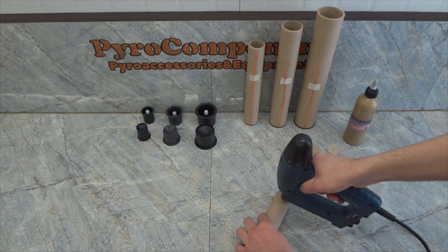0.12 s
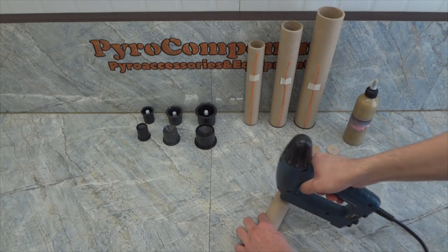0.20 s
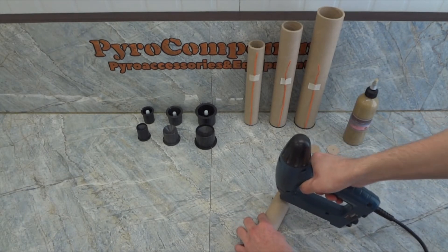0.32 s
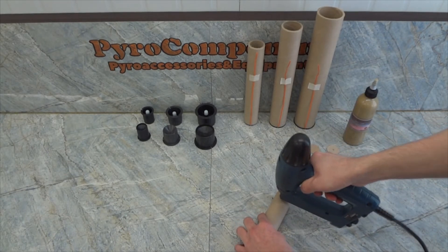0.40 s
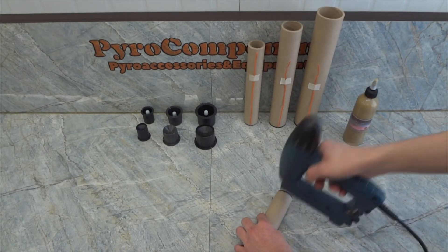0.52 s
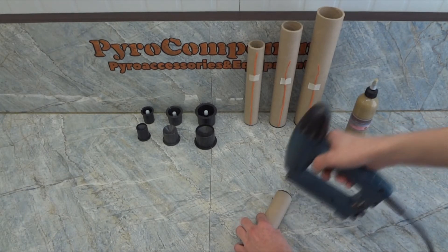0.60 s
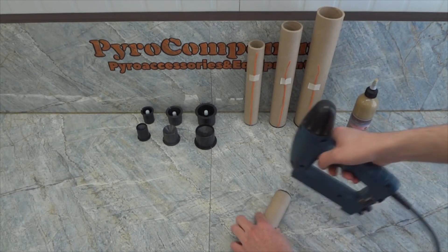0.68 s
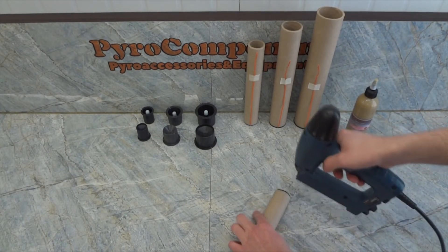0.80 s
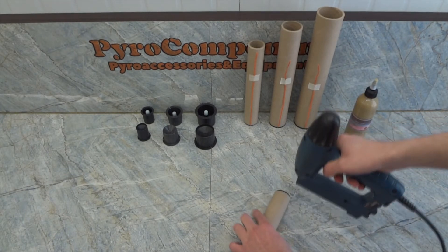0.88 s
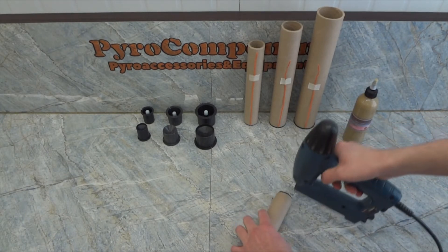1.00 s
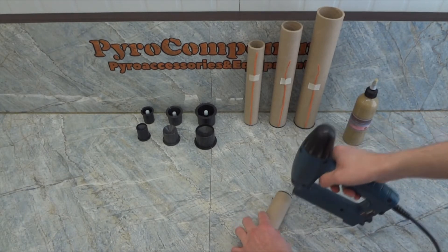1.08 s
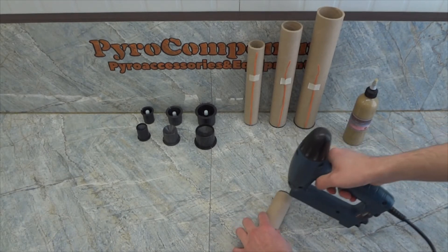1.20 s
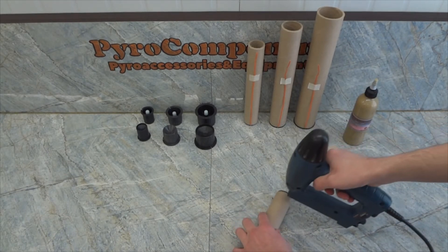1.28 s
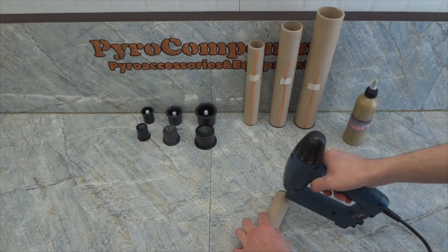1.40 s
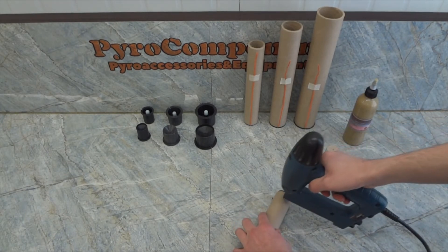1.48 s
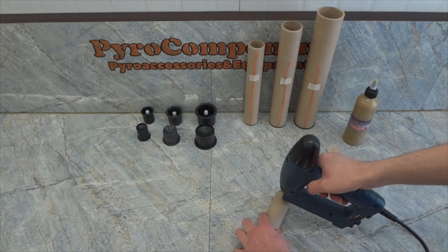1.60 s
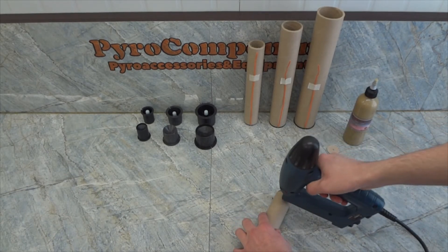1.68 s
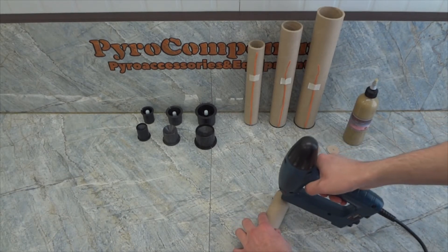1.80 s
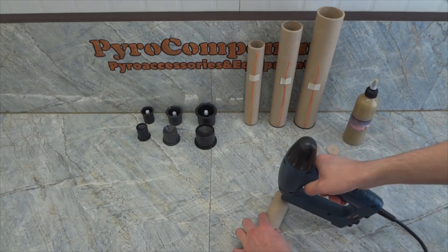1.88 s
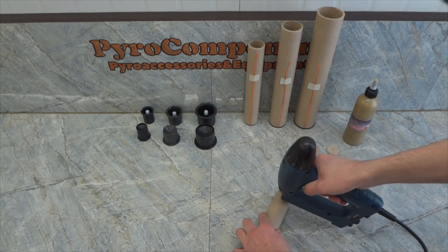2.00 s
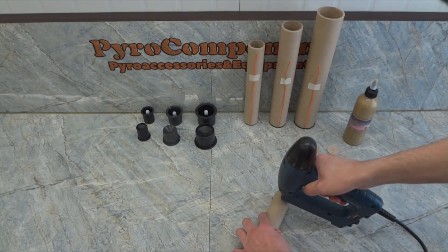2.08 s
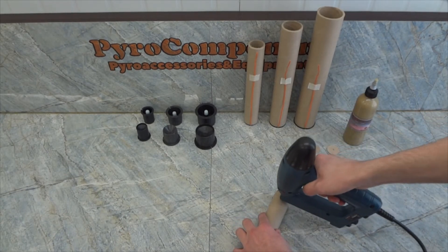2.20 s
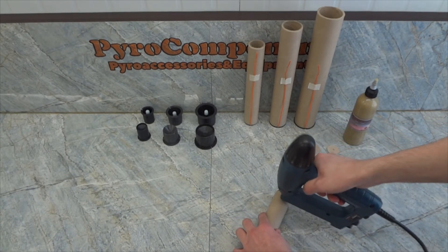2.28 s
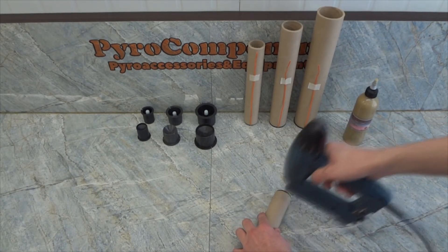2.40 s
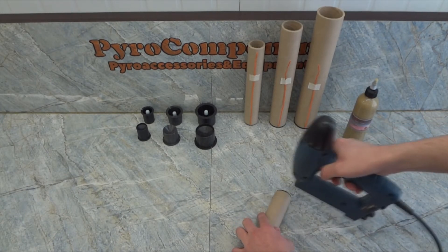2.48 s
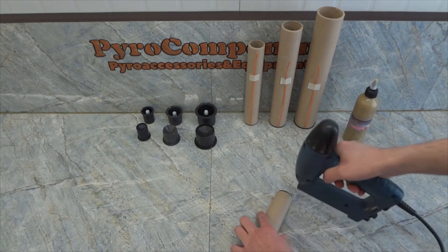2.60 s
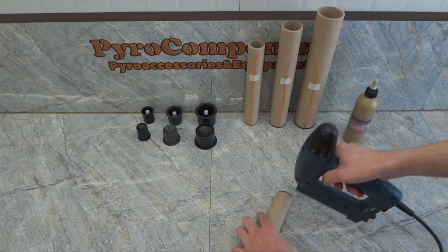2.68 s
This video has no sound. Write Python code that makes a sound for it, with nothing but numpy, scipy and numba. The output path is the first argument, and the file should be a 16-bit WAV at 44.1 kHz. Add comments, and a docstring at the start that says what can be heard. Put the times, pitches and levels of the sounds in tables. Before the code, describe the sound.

Two loud bangs from an electric staple gun, about two seconds apart, each led by trigger clicks and echoing briefly off tile. Between them, a cardboard tube is quietly tapped and knocked near the microphone.

```python
"""A hard room with a tiled floor: an electric staple gun fires twice into a cardboard tube.
Between shots the tube is turned and the gun set down on it. Each shot is trigger clicks, two ticks
of the plunger and a bang that rings the tube, the gun's steel and the room; the mechanism then
rebounds twice. A limiter ducks the bang and recovers as the echo dies, so each shot swells
before it fades."""
import sys
import numpy as np
from scipy import signal
from scipy.fft import rfft, irfft
from scipy.io import wavfile
from numba import njit

SR = 44100
rng = np.random.default_rng(int(sys.argv[2]) if len(sys.argv) > 2 else 0)


def generate_wav(signal):
    """Clip the signal to [-1, 1] and save it as 16-bit WAV at the path in sys.argv[1]."""
    frames = np.transpose(np.atleast_2d(signal))
    scaled = np.clip(frames, -1, 1) * 32767
    pcm = np.round(scaled).astype(np.int16)
    wavfile.write(sys.argv[1], SR, pcm)


N = 121275
CONTACT_SAMPLES = 16384
TOP_HZ = 15700


def undb(db):
    """Decibels to gain."""
    return 10 ** (np.asarray(db) / 20)


def curve(table, hz):
    """Table value on a log-frequency axis."""
    table_hz, values = np.array(table).T
    return np.interp(np.log(hz + 1), np.log(table_hz), values)


def freqs(size):
    """FFT bin frequencies in Hz."""
    return np.fft.rfftfreq(size, 1 / SR)


def fade(t, t60):
    """Exponential decay, 60 dB down at t60."""
    return np.exp(-np.log(1000) * t / t60)


def add(out, onset_s, sound):
    """Mix a sound in at onset_s."""
    start = max(int(onset_s * SR), 0)
    out[..., start:start + sound.shape[-1]] += sound[..., :N - start]


def resonance(peak_db, centre_hz, half_width_hz):
    """Resonant peak in dB over a contact's spectrum."""
    return peak_db / (1 + ((freqs(CONTACT_SAMPLES) - centre_hz) / half_width_hz) ** 2)


def contact(spectrum, t60, echo_db=0, tilt_db_oct=0, resonance_db=0):
    """Blow on a body. Rows: dying rattle heard directly, clean impulse that excites the room."""
    size = CONTACT_SAMPLES
    hz = freqs(size)
    octaves = np.log2(np.maximum(hz, 100) / 1000)
    gain = undb(curve(spectrum, hz) + tilt_db_oct * octaves + resonance_db)
    gain /= np.sqrt(np.mean(gain ** 2))
    # minimum phase keeps the attack sharp
    cepstrum = irfft(np.log(gain))
    cepstrum[1:size // 2] *= 2
    cepstrum[size // 2 + 1:] = 0
    body = np.exp(rfft(cepstrum))
    envelope = fade(np.arange(size) / SR, t60)
    rattle = rfft(rng.standard_normal(size) * envelope)
    impulse = np.full(len(hz), undb(echo_db) * np.sqrt(np.sum(envelope ** 2)))
    return irfft(np.array([rattle, impulse]) * body)


def diffuse_noise(width):
    """Left and right noise spectra; width sets side against mid."""
    mid, side = rfft(rng.standard_normal((2, N)))
    return mid + np.array([[1], [-1]]) * side * undb(curve(width, freqs(N)))


# background spectrum: f/Hz, relative level/dB
HISS_SPECTRUM = [(15, -50.5), (25, -31), (80, -7.5), (113, -3), (165, 0), (188, -8.5), (411, -5.5),
                 (553, -4), (1860, -9.5), (5760, -17.5), (6240, -14), (8630, -19), (14000, -16.5),
                 (15600, -22)]
# background width: f/Hz, side minus mid/dB
HISS_WIDTH = [(60, -12.5), (110, -15.5), (200, -4.5), (380, 4.5), (700, 5), (1290, 6.5), (2380, 1.5),
              (4400, -0.5), (8120, -8), (15000, -23.5)]
# electronic whine: f/Hz, level/dB
WHINE_TONES = [(13487, -77.5), (13907, -82)]


def background(hiss_db=-62):
    """Room tone and microphone hiss with a thin electronic whine."""
    t = np.arange(N) / SR
    hiss = irfft(diffuse_noise(HISS_WIDTH) * undb(curve(HISS_SPECTRUM, freqs(N))), N)
    whine = sum(undb(db) * np.sin(2 * np.pi * hz * t) for hz, db in WHINE_TONES)
    return hiss * undb(hiss_db) / hiss.std() + whine


# room decay: f/Hz, t60/s
ECHO_DECAY = [(60, 0.78), (130, 0.85), (250, 0.7), (450, 0.5), (800, 0.42), (1400, 0.39), (2600, 0.46),
              (4000, 0.42), (6000, 0.35), (9000, 0.29), (15000, 0.2)]
# echo width: f/Hz, side minus mid/dB
ECHO_WIDTH = [(60, -40), (130, -33), (260, -24.5), (450, -18.5), (700, -16.5), (1300, -10.5), (2700, -12.5),
              (5500, -12), (9000, -14.5), (14000, -17)]


def room(impulses, build_up_s=0.0045):
    """Dense echoes off hard walls, decaying band by band; the treble dies first."""
    t = np.arange(N) / SR
    noise = diffuse_noise(ECHO_WIDTH)
    band = np.round(np.sqrt(np.clip(freqs(N), 40, TOP_HZ)) / 3)
    echo = np.zeros((2, N))
    for k in np.unique(band):
        centre_hz = (3 * k) ** 2
        echo += irfft(noise * (band == k), N) * fade(t, curve(ECHO_DECAY, centre_hz))
    echo *= 1 - np.exp(-t / build_up_s)
    echo /= np.sqrt(np.sum(echo ** 2) / 2)
    return signal.fftconvolve(impulses[None], echo, axes=1)[:, :N]


# tube taps, gun knocks: t/s, level/dB, t60/s, tilt/(dB/oct)
TUBE_TAPS = [(.001, -59.5, 0.18, 3), (.03, -55, 0.056, 3.5), (.0538, -42.5, .007, 7.5),
             (1.2505, -44, 0.015, -2.5), (1.6328, -41, 0.034, 0), (1.703, -48, 0.079, 4.5),
             (1.752, -46, .03, -1), (1.87, -63, 0.2, 2.5), (1.925, -61.5, 0.079, 3), (1.99, -68, 0.68, 5)]
GUN_KNOCKS = [(.018, -53, .06, -4.5), (1.691, -52, 0.15, -8), (1.7025, -37, 0.076, 2), (1.725, -40, .08, 2)]
# their spectra: f/Hz, relative level/dB
TAP_SPECTRUM = [(100, -21), (400, -20), (650, -4), (900, -6.5), (1300, -0.5), (1900, -1), (2800, -10),
                (4200, -12.5), (7000, -18), (13000, -24.5), (15500, -27)]
KNOCK_SPECTRUM = [(30, -25), (60, -11), (125, -8.5), (180, -15), (280, -7), (370, 1), (430, -0.5), (500, 5),
                  (560, -8), (640, 7), (800, -15), (1300, -18.5), (2100, -14.5), (3200, -34.5),
                  (15000, -46.5)]


def handling():
    """Light taps of the tube and dull knocks as the gun is pressed on it."""
    out = np.zeros((2, N))
    for onset_s, db, t60, tilt in TUBE_TAPS:
        add(out, onset_s, undb(db) * contact(TAP_SPECTRUM, t60, tilt_db_oct=tilt))
    for onset_s, db, t60, tilt in GUN_KNOCKS:
        add(out, onset_s, undb(db) * contact(KNOCK_SPECTRUM, t60, echo_db=-6.5, tilt_db_oct=tilt))
    return out


# trigger and spring clicks: t/s, level/dB, t60/s, ping gain/dB
TRIGGER_CLICKS = [(0.1608, -40, 0.019, 2.5), (.173, -48.5, 0.1, -3), (.212, -48.5, .15, 3),
                  (0.2243, -42.5, 0.092, 2), (2.0932, -44, 0.022, 9.5), (2.121, -47.5, 0.02, 0),
                  (2.147, -77, 0.061, -0.5), (2.1593, -45.5, 0.034, 6)]
# click spectrum: f/Hz, relative level/dB
CLICK_SPECTRUM = [(100, -10.5), (500, -5), (1500, -4.5), (2600, -1.5), (4600, -1.5), (6000, -5),
                  (8000, -4.5), (12000, -3.5), (15500, -10.5)]


def trigger():
    """Trigger clicks, coloured by the spring's ping."""
    out = np.zeros((2, N))
    for onset_s, db, t60, ping_db in TRIGGER_CLICKS:
        ping = resonance(ping_db, centre_hz=4950, half_width_hz=500)
        add(out, onset_s, undb(db) * contact(CLICK_SPECTRUM, t60, resonance_db=ping))
    return out


# rebounds: t after bang/s, level/dB, tilt/(dB/oct)
REBOUND_CLACKS = [(.128, -16, -3.5), (.176, -19, .5)]
# clack spectrum: f/Hz, relative level/dB
CLACK_SPECTRUM = [(60, -28), (200, -13), (350, -2), (700, 6.5), (1200, -14.5), (2000, 1), (3000, 5.5),
                  (5000, -4.5), (8000, -16.5), (15500, -30.5)]


def rebounds(shot_times_s):
    """The plunger springs back and the gun jolts: two duller clacks per shot."""
    out = np.zeros((2, N))
    for shot_s in shot_times_s:
        for delay_s, db, tilt in REBOUND_CLACKS:
            clack = contact(CLACK_SPECTRUM, t60=0.046, echo_db=2.5, tilt_db_oct=tilt)
            add(out, shot_s + delay_s, undb(db) * clack)
    return out


# tube, steel and low room modes: f/Hz, initial level/dB, t60/s
MODES = [(116, -55, 1.9), (126.5, -37.5, 1.1), (459.6, -18.5, .55), (554, -16, 0.53), (633.6, -9, .42),
         (688, -11, .42), (732, -9.5, 0.41), (774, -13.5, 0.32), (905, -13.5, 0.36), (946, -13.5, .33),
         (1320, -58.5, 3.6), (1960, -30, 0.82), (2013, -15.5, .34), (2720, -16.5, .36)]


def ringing(shot_times_s):
    """Tube, gun steel and room ring on after each shot as damped sines."""
    out = np.zeros(N)
    t = np.arange(N) / SR
    for shot_s in shot_times_s:
        for hz, db, t60 in MODES:
            add(out, shot_s, undb(db) * fade(t, t60) * np.sin(2 * np.pi * (hz * t + rng.random())))
    return out


# shots: t/s, level/dB, tube resonance f/Hz, its gain/dB, tilt/(dB/oct)
STAPLE_SHOTS = [(.2412, 18.5, 713, 7.5, 0.43), (2.182, 18, 644, 10.5, -0.01)]
# plunger ticks: t before bang/s, level/dB
PLUNGER_TICKS = [(0.0088, -28), (0.0027, -28)]
# bang and tick spectrum: f/Hz, relative level/dB
DRIVER_SPECTRUM = [(30, -39.5), (60, -27), (95, -30.5), (122, -21), (160, -20), (205, -31), (260, -14),
                   (350, -9), (470, -5), (700, -2.5), (950, 2), (1150, -3.5), (1400, 2.5), (1650, -6.5),
                   (2000, 4), (2350, -3), (2750, 0.5), (3400, -2.5), (5000, 0), (7000, -1), (9000, -2),
                   (12500, -0.5), (15500, -8)]


def staple_gun():
    """The plunger ticks twice, then the driver strikes with a bang coloured by the tube."""
    out = np.zeros((2, N))
    for shot_s, db, tube_hz, tube_db, tilt in STAPLE_SHOTS:
        tube = resonance(tube_db, tube_hz, half_width_hz=65)
        bang = contact(DRIVER_SPECTRUM, t60=0.043, echo_db=2.5, tilt_db_oct=tilt, resonance_db=tube)
        add(out, shot_s, undb(db) * bang)
        for lead_s, tick_db in PLUNGER_TICKS:
            tick = contact(DRIVER_SPECTRUM, t60=0.026, tilt_db_oct=-0.6)
            add(out, shot_s - lead_s, undb(tick_db) * tick)
    return out


def scene():
    """Gun and tube at the centre, stereo echo and background around them."""
    shot_times_s = [shot[0] for shot in STAPLE_SHOTS]
    direct, impulses = staple_gun() + rebounds(shot_times_s) + trigger() + handling()
    return direct + room(impulses) + ringing(shot_times_s) + background()


@njit
def follow_peaks(level, attack_s, release_s, hold_s):
    """Peak follower: fast rise, short hold after a big jump, slow fall."""
    attack = 1 - np.exp(-1 / (SR * attack_s))
    release = 1 - np.exp(-1 / (SR * release_s))
    out = np.empty(len(level))
    peak, wait = 0., 0.
    for i in range(len(level)):
        wait = hold_s * SR if level[i] > 2 * peak else wait - 1
        if level[i] > peak:
            peak += (level[i] - peak) * attack
        elif wait <= 0:
            peak -= peak * release
        out[i] = peak
    return out


def record(dry):
    """A fast limiter holds the bangs down and lets go as they fade; a steep low-pass follows."""
    threshold_db, duck_db_per_db, lookahead_s = -7, 1.085, 0.0017
    peak = follow_peaks(np.abs(dry).max(axis=0), attack_s=0.0001, release_s=0.033, hold_s=0.011)
    peak_ahead = np.interp(np.arange(N) + lookahead_s * SR, np.arange(N), peak)
    gain = np.maximum(peak_ahead / undb(threshold_db), 1) ** -duck_db_per_db
    lowpass = signal.ellip(10, 0.2, 80, TOP_HZ, fs=SR, output="sos")
    return signal.sosfilt(lowpass, dry * gain)


dry = scene()
out = record(dry)
generate_wav(out)
```